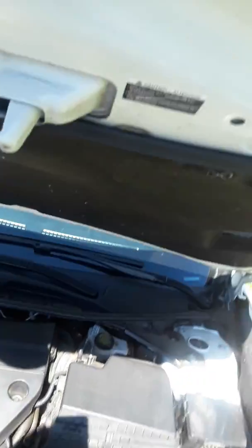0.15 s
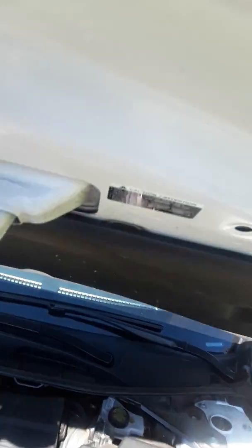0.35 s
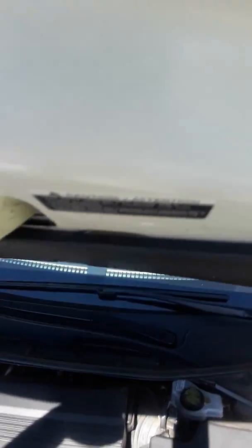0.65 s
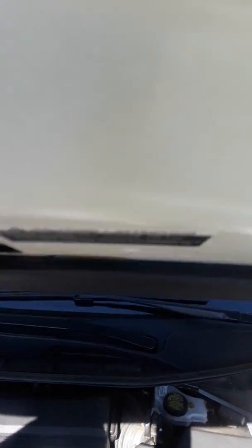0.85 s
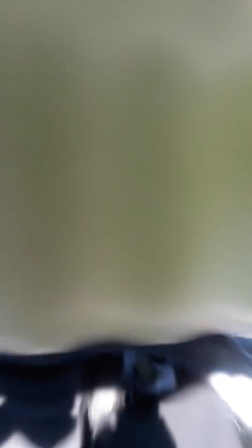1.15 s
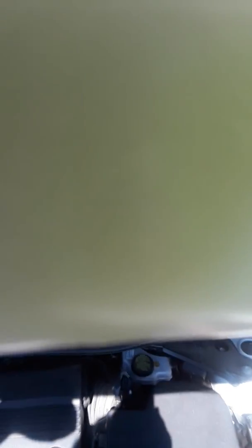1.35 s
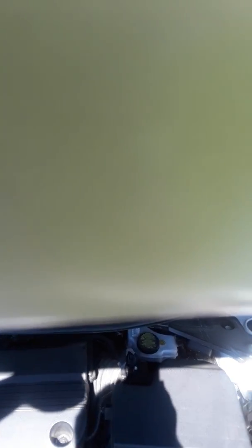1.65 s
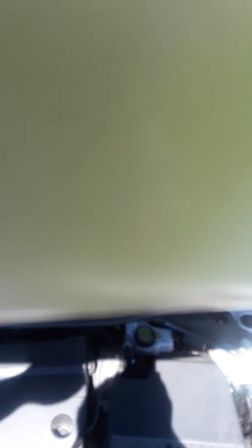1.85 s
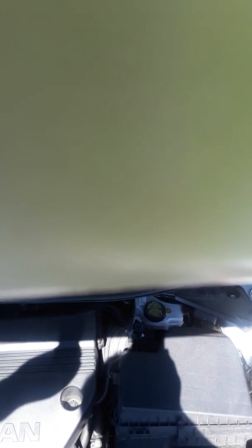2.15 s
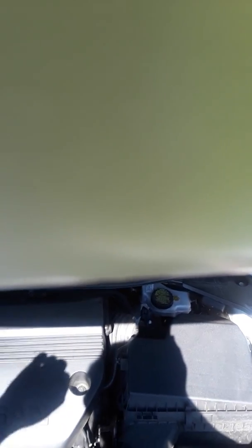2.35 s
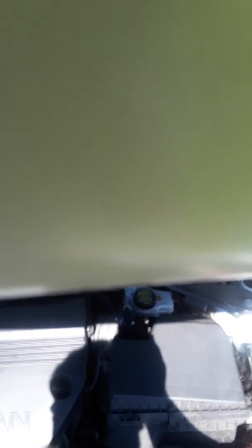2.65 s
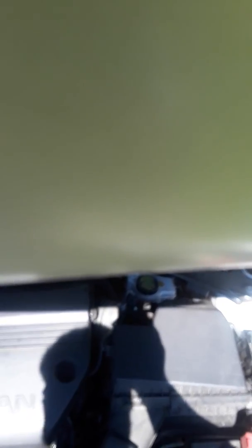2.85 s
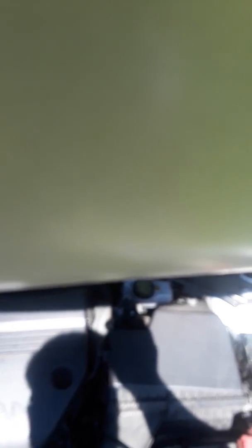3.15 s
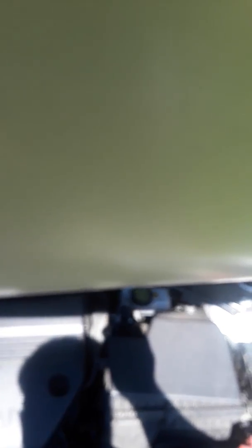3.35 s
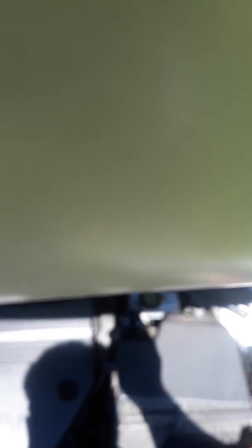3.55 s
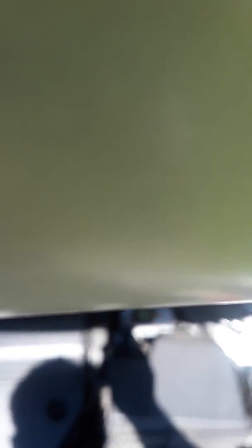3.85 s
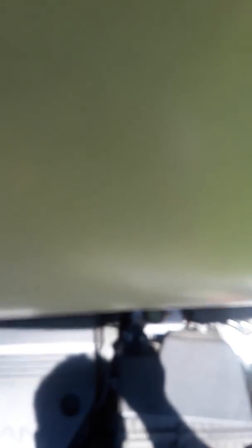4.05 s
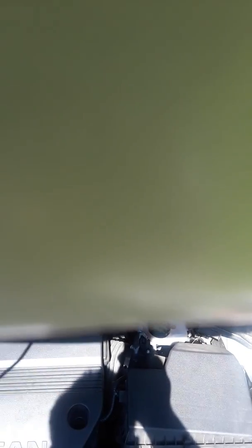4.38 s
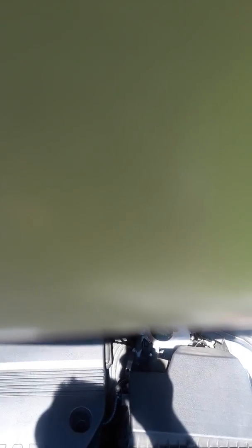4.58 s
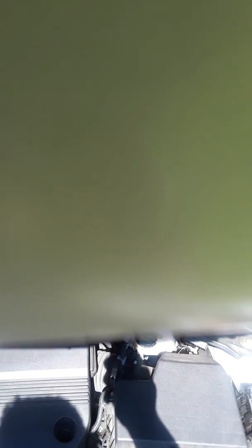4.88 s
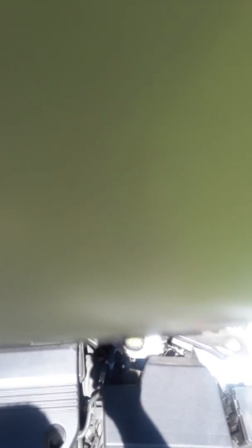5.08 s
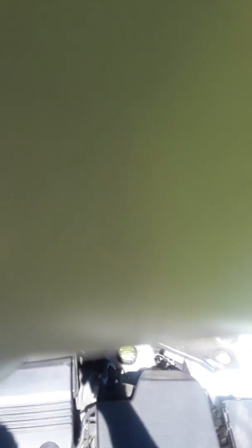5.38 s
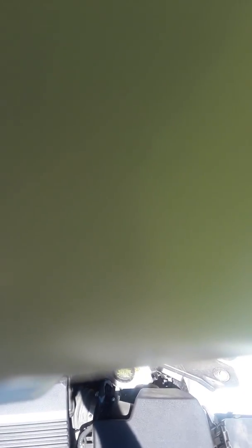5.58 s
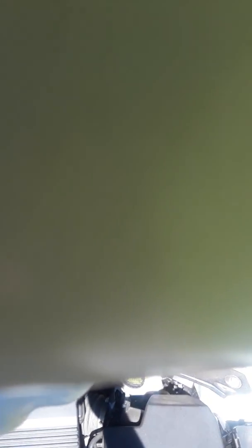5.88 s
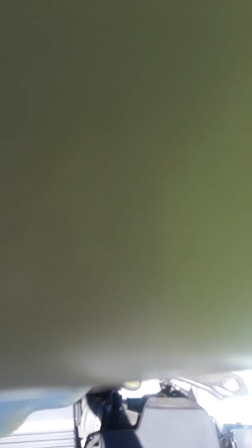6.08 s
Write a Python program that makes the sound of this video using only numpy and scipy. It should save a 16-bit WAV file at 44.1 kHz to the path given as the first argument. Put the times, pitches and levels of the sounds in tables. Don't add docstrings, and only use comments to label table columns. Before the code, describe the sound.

Close over an open engine bay, a rough four-cylinder idle hums and ticks under sharp metallic latch clacks, sheet-metal thumps and a scraping rod.

```python
import sys
import numpy as np
from scipy import signal
from scipy.fft import rfft, irfft, next_fast_len
from scipy.io import wavfile

SR = 44100
rng = np.random.default_rng(int(sys.argv[2]) if len(sys.argv) > 2 else 0)


def nominal_scale(level):
    x = np.asarray(level, float) / 20
    return 10 ** x


def generate_wav(sig):
    pcm = np.round(np.clip(np.atleast_2d(sig).T, -1, 1) * 32767).astype(np.int16)
    wavfile.write(sys.argv[1], SR, pcm)


N = 274302
SIZE = next_fast_len(N)


def curve(table):
    s, *columns = np.transpose(table)
    return [np.interp(np.arange(N) / SR, s, c) for c in columns]


def across(table, hz):
    f, *columns = np.transpose(table)
    return [np.interp(np.log(hz), np.log(f), c) for c in columns]


def walk(rate):
    place = np.arange(N) * rate / SR
    k = place.astype(int)
    values = rng.standard_normal(int(N * rate / SR) + 2)
    share = place - k
    return 1.15 * (values[k] + (values[k + 1] - values[k]) * share ** 2 * (3 - 2 * share))


def bump(s, length, db):
    return nominal_scale(db) * np.exp(-(2 * (np.arange(N) / SR - s) / length) ** 4)


def add(out, s, pan_db, sound):
    i = int(s * SR)
    n = min(sound.shape[-1], N - i)
    out[:, i:i + n] += sound[..., :n] * nominal_scale(np.array([[pan_db], [-pan_db]]) / 2)


# (frequency [Hz], correlation [-1 to 1], left minus right [dB])
PORT_LIKENESS = [(40, .8, 0), (200, .97, .3), (650, .93, 3.2), (950, 0, 3.3), (1200, -.7, 2.5),
                 (1500, -.78, 2.2), (1900, 0, 1), (2350, .35, 0), (3000, -.25, .3), (4000, .1, 1),
                 (16000, 0, 1)]


def ports(mono, other):
    hz = np.maximum(np.fft.rfftfreq(SIZE, 1 / SR), 1)
    like, pan_db = across(PORT_LIKENESS, hz)
    like = np.clip(like, -.95, .99)
    mid = rfft(mono)
    side = rfft(other) * np.sqrt((1 - like) / (1 + like))
    left_lag = np.exp(-1j * 0.3 * np.minimum(hz / 700, 1))
    return np.array([(mid + side) * nominal_scale(pan_db / 2) * left_lag, (mid - side) * nominal_scale(-pan_db / 2)]), hz


# (level [dB], change under the hood [dB], change under the hand [dB])
RUMBLE, BOOM, HISS, UPPER, TOP = (-38, 0.63, -1), (-41, 6.6, 1.2), (-39.5, 1, 0.59), (-51, 0.97, -6), (-54, 0.61, -5)
# (time [s], hood overhead [share], hand cupped [share])
PHONE_COVER = [(0, 0, 0.6), (.3, 0, 0.33), (.7, 0.64, .05), (1.0, 0.82, 0.1), (1.4, 0.36, 0.5),
               (2.1, 0.45, 0.57), (2.3, 1, 0.9), (2.55, 1.15, 0.66), (2.85, 1.08, .25), (3.4, 0.96, 0.03),
               (4.3, 1.1, 0.07), (4.7, 0.88, 0), (4.95, 0.93, .3), (5.5, 0.85, 0.1), (6.22, 0.82, 0.3)]


def covered(layer):
    hood_share, hand_share = curve(PHONE_COVER)
    return layer[0] + layer[1] * hood_share + layer[2] * hand_share


FIRING_HZ = 23.6
# (time [s], lag behind the steady rate [cycles])
IDLE_WANDER = [(0, .72), (3.0, .74), (3.7, .91), (6.22, .9)]


def firings():
    turns = FIRING_HZ * np.arange(N) / SR - curve(IDLE_WANDER)[0] + 2
    cycle, phase = turns.astype(int), turns % 1
    size = nominal_scale(0.68 * rng.standard_normal((cycle.max() + 2, 2)))
    tick = size[cycle, 1] * phase / 0.06 * np.exp(1 - phase / 0.067)
    ahead = turns + .14
    firing = ahead.astype(int)
    since = ahead % 1 - .12
    strong = nominal_scale(1.5 * (-1) ** firing) * size[firing, 0]
    boom = 1 + .3 * strong * np.exp(-(since / .11) ** 2)
    ring_hz = 626 * (1 + 0.079 * rng.standard_normal(cycle.max() + 2))[firing]
    knock = strong * np.exp(-(since / 0.092) ** 2) * np.sin(2 * np.pi * ring_hz * since / FIRING_HZ)
    return boom, tick, knock * nominal_scale(np.array([[1.6], [-1.6]]))


# (frequency [Hz], density [dB per Hz])
BAY_SPECTRUM = [(15, -61), (25, -22), (80, -16.5), (180, -6), (427, -6), (575, -0.5), (1370, -16),
                (2110, -18.5), (3820, -21.5), (4610, -21), (5280, -30.5), (6050, -31), (8830, -40),
                (14000, -30.5), (16000, -45.5)]
# (frequency [Hz], width [Hz], gain [dB])
CAVITY_MODES = [(643.5, 58, 5.5), (538, 10, 1.5), (2175, 580, 9), (7100, 880, 4.5), (3500, 510, 3),
                (15900, 360, 18)]


def bay_bands(field, hz):
    colour = nominal_scale(across(BAY_SPECTRUM, hz)[0])
    for f, width, db in CAVITY_MODES:
        colour = colour * nominal_scale(db / (1 + (2 * (hz - f) / width) ** 2))
    above = [1 / (1 + (edge / hz) ** 6) for edge in [0, 420, 900, 5300, 9500, 4 * SR]]
    return [irfft(field * colour * (lo - hi), SIZE)[:, :N] for lo, hi in zip(above, above[1:])]


# (time [s], length [s], level [dB])
SLOT_WHISTLES = [
    (.1, 1.1, -53.5),
    (1.203, 1.1, -51),
    (2.428, 0.49, -48.5),
    (4.734, 0.36, -52),
    (5.6, 1.1, -54),
]


def slot_whistle(field, hz):
    sound = irfft(field / (1 + (2 * (hz - 1284) / 160) ** 2), SIZE)[:, :N]
    return sound, 20 * np.log10(sum(bump(*row) for row in SLOT_WHISTLES) + 1e-6)


def engine():
    boom, tick, knock = firings()
    field, hz = ports(*rng.standard_normal((2, SIZE)))
    rumble, bay, hiss, upper, top = bay_bands(field, hz)
    parts = [(knock, covered(BOOM) - 5),
             (bay * boom, covered(BOOM) + walk(11)),
             (rumble * boom ** 0.25, covered(RUMBLE) + 2 * walk(11)),
             (hiss * (1 + 0.21 * tick), covered(HISS) + 0.58 * walk(17)),
             (top * (1 + 0.73 * tick), covered(TOP) + .5 * walk(53)),
             (upper * (1 + 0.32 * tick), covered(UPPER) + 0.95 * walk(23)),
             slot_whistle(field, hz)]
    return sum(p / p.mean(axis=0).std() * nominal_scale(db) for p, db in parts)


# (multiple of slot pitch, level between swells [dB])
STRONG_LINES = [(3, -61.5), (4, -54), (5, -62), (6, -63)]
# (multiple of slot pitch, level over the hiss or upper layer [dB])
FAINT_LINES = [(1, -22), (2, -19), (7, -24), (8, -29), (10, -25), (11, -24), (12, -17), (13, -20)]
# (time [s], length [s], level [dB], multiple)
WHINE_SWELLS = [(0.025, .08, -53, 3), (0.076, .06, -51, 4), (.22, 0.13, -43, 4), (0.476, 0.14, -46.5, 4),
                (.66, 0.25, -53.5, 4), (0.94, 0.25, -43.5, 4), (1.125, 0.12, -47.5, 4), (.9, .15, -54, 3),
                (1.616, 0.26, -47, 4), (1.952, 0.41, -54, 4), (3.13, 0.51, -50, 4), (3.97, 0.55, -59, 4),
                (4.743, 0.61, -48.5, 4), (5.85, 1.1, -48.5, 4), (3.45, .5, -52.5, 3), (4.4, 1, -61, 3),
                (.1, .2, -65, 5), (2.85, 0.2, -57, 5), (3.6, 0.26, -60, 5), (4.094, 0.23, -58, 5),
                (4.62, 0.18, -71, 5), (5.322, 0.16, -57, 5), (5.95, 0.7, -53, 5), (3.5, .9, -70, 6),
                (4.454, 0.71, -63, 6), (6.05, .4, -57, 6)]


def alternator():
    turn = 2 * np.pi * np.cumsum(1173 + .6 * walk(8)) / SR
    stack = []
    for k, db in STRONG_LINES:
        swell = sum(bump(s, length, swell_db) for s, length, swell_db, m in WHINE_SWELLS if m == k)
        stack.append((k, (nominal_scale(db) + swell) * nominal_scale(1.1 * walk(9))))
    for k, db in FAINT_LINES:
        stack.append((k, nominal_scale(db + 1.2 + 2.5 * walk(1.44) + covered(HISS if k < 3 else UPPER))))
    out = np.zeros((2, N))
    for k, gain in stack:
        phase = k * turn
        side = walk(2.51) * np.sin(phase) + 0.14 * walk(2.27) * np.cos(phase)
        out += np.sqrt(2) * gain * (np.sin(phase) + side * np.array([[1], [-1]]))
    return out


# (left minus right [dB], [(time [s], peak [dB], frequency [Hz]), ..]) # A hand bumps
HAND_BURST = (-25.5, [(.001, -15.5, 300), (.007, -20.5, 260), (.012, -14, 136), (.043, -18, 358),
              (.050, -30, 152), (.057, -16.5, 200), (.0605, -19, 496), (.074, -28.5, 154),
              (.099, -30, 200)])
LATCH_BURST = (6.8, [(1.051, -6, 269), (1.0605, -15, 200), (1.065, -15, 300), (1.0694, -8.5, 384),
               (1.0734, -9, 215), (1.0771, -4, 200), (1.0844, -9, 220), (1.093, -18, 300),
               (1.112, -17, 170), (1.128, -25, 130)])
UNCLIP_BURST = (1.4, [(3.7285, -8.5, 620), (3.732, -7, 440), (3.738, -3.5, 630), (3.744, -11.5, 423),
                (3.749, -12, 300), (3.755, -17, 447), (3.768, -21, 242)])
PROP_BURST = (3.3, [(4.517, -7, 300), (4.528, -11, 137), (4.538, -17, 160), (4.547, -10.5, 252),
              (4.563, -16, 247), (4.573, -19, 126), (4.532, -25, 176), (4.658, -34, 95),
              (4.809, -21.5, 196)])
SETTLE_BURST = (4.9, [(5.131, -20, 290), (5.140, -16.5, 300), (5.147, -26, 310), (5.153, -29, 258),
                (5.125, -20, 500)])
GRIP_BURST = (-23, [(5.757, -36.5, 111), (5.816, -43, 80)])
# (time [s], peak [dB], frequency [Hz], left minus right [dB])
ROD_RINGS = [
    (4.603, -17, 634, 9),
    (4.639, -23, 602, 5),
    (4.774, -25.5, 1040, 11),
    (5.112, -23, 817, 18),
    (5.1155, -18, 877, 4),
]


def thumps():
    out, t = np.zeros((2, N)), np.arange(SR // 6) / SR
    blows = [(s, db, hz, 47, pan_db) for s, db, hz, pan_db in ROD_RINGS]
    for pan_db, burst in (HAND_BURST, LATCH_BURST, UNCLIP_BURST, PROP_BURST, SETTLE_BURST, GRIP_BURST):
        for s, db, hz in burst:
            cycles = 5.9 - 0.04 * (db + 19)
            blows.append((s, db, hz, cycles, pan_db))
    for s, db, hz, cycles, pan_db in blows:
        shape = (1 - np.exp(-t * hz * 2.7)) * np.exp(-np.log(1000) * t * hz / cycles)
        add(out, s, pan_db, nominal_scale(db) * shape / shape.max() * np.sin(2 * np.pi * hz * t / (1 + 3 * t)))
    return out


# (frequency [Hz], level [dB], t60 [s])
HOOD_MODES = [(80, 2, 0.26), (130, -17, 0.26), (200, -8.5, 0.23), (300, 2, 0.1), (430, 6, 0.061),
              (925, -0.5, 0.17), (2300, -12.5, 0.32), (3630, -18, 0.41), (7000, -16, 0.49)]


def hood(blows):
    t, tail = np.arange(16384) / SR, 0
    f = np.maximum(np.fft.rfftfreq(16384, 1 / SR), 1)
    for hz, db, t60 in HOOD_MODES:
        noise = rng.standard_normal((2, 16384))
        if hz < 700:
            noise[1] = noise[0] + 0.61 * noise[1]
        ring = irfft(rfft(noise) * np.exp(-(np.log2(f / hz) / 0.35) ** 2))
        ring = ring / ring.std() * np.sqrt(hz / 200)
        tail = tail + nominal_scale(db) * ring * np.exp(-np.log(1000) * t / t60) * (1 - np.exp(-t / 0.0065))
    return nominal_scale(-52.5) * signal.oaconvolve(blows, tail, axes=1)[:, :N]


# (time [s], left minus right [dB],
# [(frequency [Hz], peak [dB], t60 [s], width [share of frequency]), ..])
METAL_STRIKES = [
    (1.051, 11, [(3500, -13, 0.027, 0.77), (2300, -9, 0.024, 0.64), (5900, -15, 0.018, 0.31), (15000, -26, .03, .3)]),
    (1.054, 15, [(1550, -14, 0.014, 0.15)]),
    (3.7287, 5, [(3000, -13, 0.033, 0.44), (7300, -20.5, 0.012, 0.22), (10500, -21, 0.015, .2), (14500, -17, .02, .3), (3960, -22, 0.028, .25)]),
    (4.5175, 1.7, [(1190, -4, 0.036, 0.97), (2420, -4.5, 0.028, 0.32), (4400, -15, .025, 0.15), (7000, -23, .008, 1.2), (14000, -24, .01, 0.44)]),
    (5.1145, 2.3, [(1370, -16, 0.052, 0.1), (2220, -28, .03, .2)]),
]
# (time [s], peak [dB], frequency [Hz], left minus right [dB])
SPRING_TICKS = [
    (0.7862, -17.5, 6500, -4),
    (.8314, -30, 12500, -4),
    (1.0628, -18, 6460, 5),
    (1.0717, -11.5, 5800, 10),
    (1.1624, -23, 5000, -5),
    (1.548, -30, 9000, -5),
    (2.187, -20, 3100, -2),
    (4.5784, -23, 9000, 7),
    (5.19, -19, 2300, 2),
]
# (time [s], peak [dB], frequency [Hz], t60 [s])
GRIT_SCRAPES = [
    (1.064, -17, 2000, .056),
    (3.7314, -10, 2060, 0.056),
    (3.744, -19, 2900, 0.044),
    (4.5225, -14, 2600, 0.049),
    (4.5333, -17.5, 2900, 0.098),
    (4.548, -34, 7100, 0.088),
    (4.5558, -17.5, 2300, 0.18),
    (4.6, -22, 1100, 0.23),
    (4.641, -19.5, 1260, 0.28),
    (4.69, -24, 2470, 0.44),
]


def contacts():
    rows = [(s, db, hz, t60, share, pan_db) for s, pan_db, part in METAL_STRIKES for hz, db, t60, share in part]
    rows += [(s, db, hz, .007, 0.95, pan_db) for s, db, hz, pan_db in SPRING_TICKS]
    return rows + [(s, db, hz, t60, 0.66, 0) for s, db, hz, t60 in GRIT_SCRAPES]


def cracks():
    out, t = np.zeros((2, N)), np.arange(4096) / SR
    f = np.maximum(np.fft.rfftfreq(4096, 1 / SR), 1)
    like = np.clip(across(PORT_LIKENESS, f)[0], -.9, .9)
    for s, db, hz, t60, share, pan_db in contacts():
        grit = np.exp(-np.log(1000) * t / t60) * (1 - np.exp(-t / t60 * 30))
        snap = 2.3 * min(1, 0.037 / t60) * np.exp(-t / 0.00024)
        left, other = rfft(rng.standard_normal((2, 4096)) * (grit + snap))
        pair = np.array([left, like * left + np.sqrt(1 - like ** 2) * other])
        ring = irfft(pair / (1 + 1j * (f / hz - hz / f) / share) ** 2)
        add(out, s, pan_db, nominal_scale(db) * ring / np.abs(ring).max(axis=1, keepdims=True))
    return out


def scene():
    blows = thumps() + cracks()
    return engine() + alternator() + blows + hood(blows)


def band_limit(x):
    return signal.sosfilt(signal.butter(12, 16990, fs=SR, output="sos"), x)


def record(dry):
    t = np.arange(N) / SR
    start_s, fall_s, hold_s, rise_s = 1.113, 0.17, 0.87, 0.27
    steps = np.cumsum([start_s, fall_s, hold_s, rise_s])
    bend = np.where(t > steps[2], 2.6, 1)
    gain = nominal_scale(-9 * np.interp(t, steps, [0, 1, 1, 0]) ** bend)
    low = signal.butter(3, 50, "high", fs=SR, output="sos")
    top = signal.ellip(10, .3, 60, 16000, fs=SR, output="sos")
    heard = signal.sosfilt(np.vstack([low, top]), np.tanh(0.56 * gain * dry) / 0.64)
    return band_limit(heard)


dry = scene()
out = record(dry)
generate_wav(out)
```